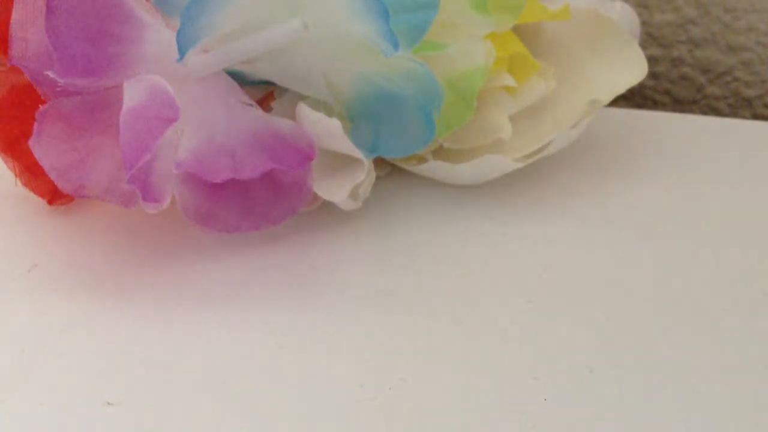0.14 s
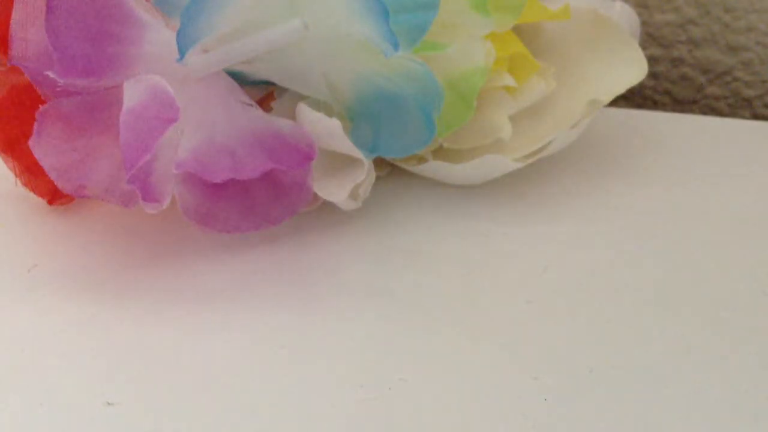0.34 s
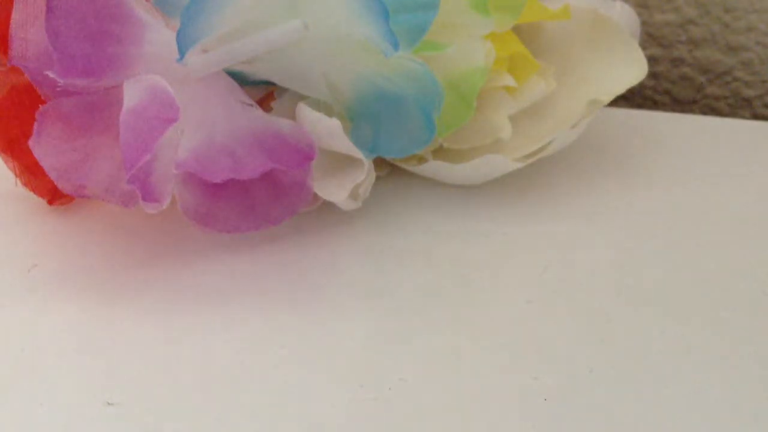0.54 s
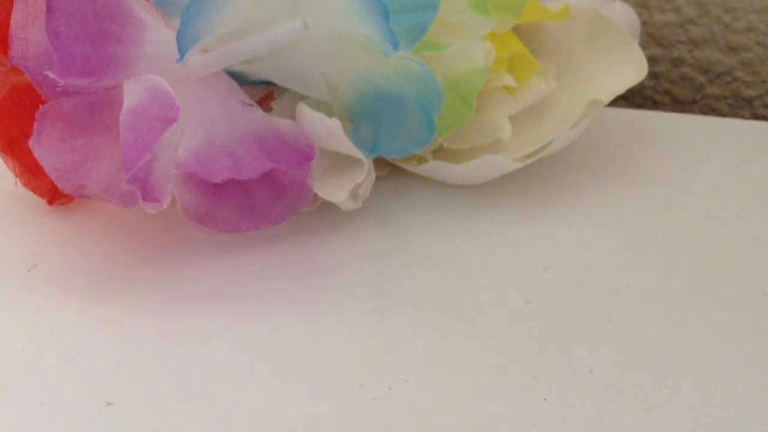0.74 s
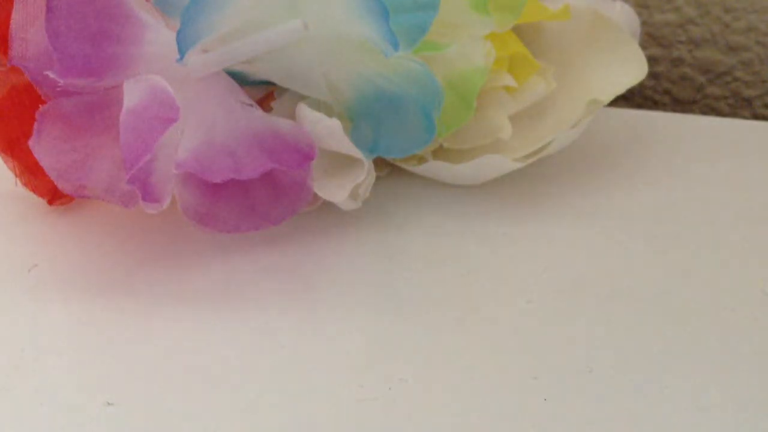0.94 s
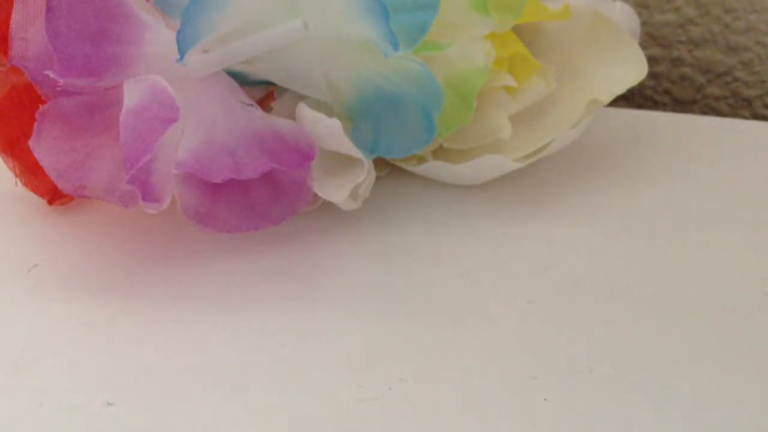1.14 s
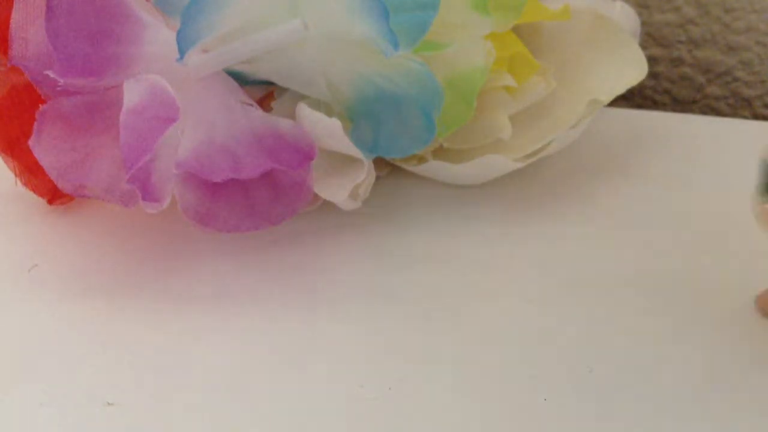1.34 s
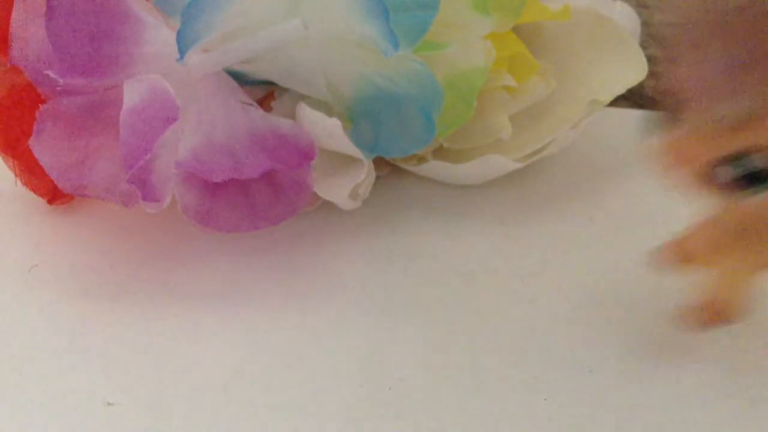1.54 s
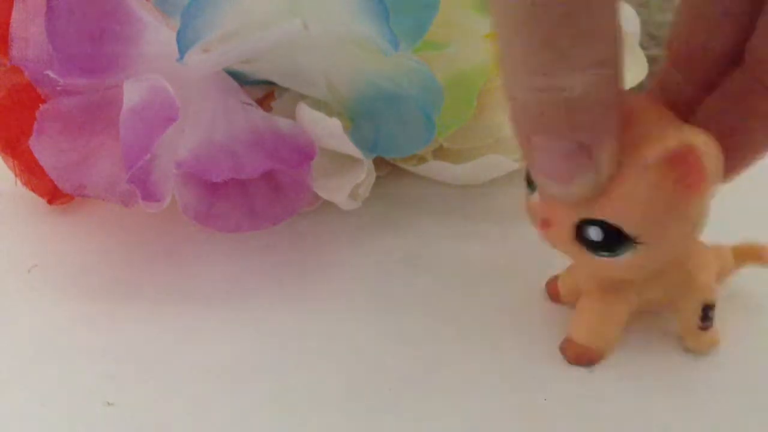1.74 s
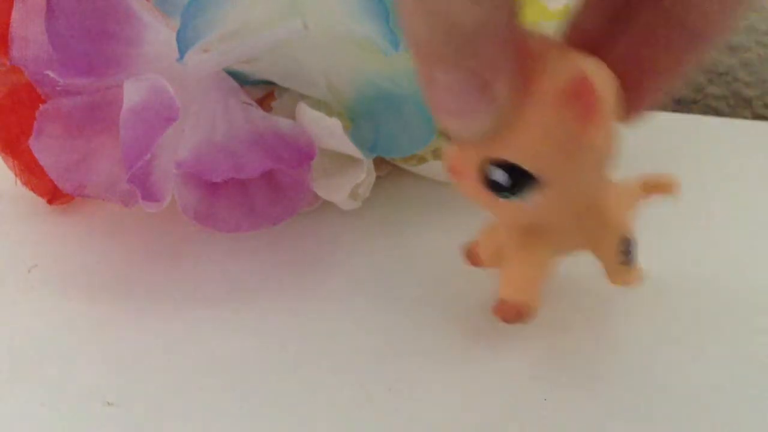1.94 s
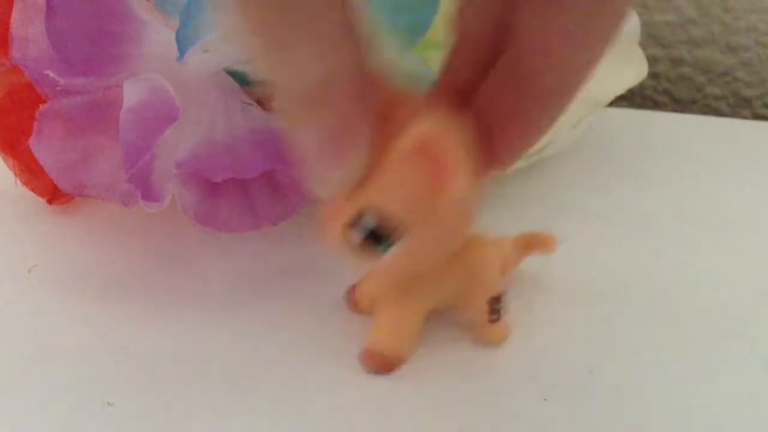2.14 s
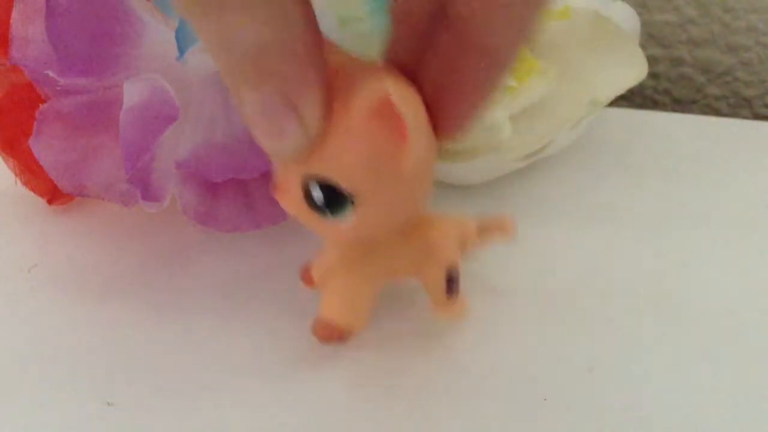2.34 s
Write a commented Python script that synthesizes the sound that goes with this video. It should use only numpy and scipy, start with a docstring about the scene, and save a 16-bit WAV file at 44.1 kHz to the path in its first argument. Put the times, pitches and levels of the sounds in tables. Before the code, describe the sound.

Light hollow clacks of a plastic toy figure hopping across a table, over faint hum.

```python
"""Faint mains hum and hiss in a quiet room, a light tick, then a small plastic toy figure hops along
a hard tabletop, close to the microphone. At each hop its feet clack down a few milliseconds apart:
the hollow toy knocks, the table rings and the room answers. Between the hops the plastic ticks
in the fingers, and there is one soft, dry pop."""
import sys
import numpy as np
from scipy import signal
from scipy.fft import rfft, irfft
from scipy.io import wavfile

SR = 44100
rng = np.random.default_rng(int(sys.argv[2]) if len(sys.argv) > 2 else 0)


def put_to_file(sound):
    """Save the sound as 16-bit audio at rate SR, in the file named by the first command-line argument."""
    columns = np.atleast_2d(sound).T  # one column per channel
    safe = np.clip(columns, -1, 1)
    whole_steps = np.round(safe * 32767)
    wavfile.write(sys.argv[1], SR, whole_steps.astype(np.int16))


N = 110250
RING_N = SR // 2
AGE_S = np.arange(RING_N) / SR   # time since a strike
LOW_CUT_HZ = 223   # thins the knocks and clacks


def from_db(db):
    """Decibels to gain."""
    return 10 ** (np.asarray(db) / 20)


def at_hz(table, hz, column=1):
    """Reads one column of a table along log frequency."""
    rows = np.array(table)
    return np.interp(np.log(hz + 1), np.log(rows[:, 0]), rows[:, column])


def butter(x, hz, kind, order=2):
    """Butterworth filter."""
    sos = signal.butter(order, np.clip(hz, 10, SR / 2 - 500), kind, fs=SR, output="sos")
    return signal.sosfilt(sos, x)


def add(track, start_s, sound):
    """Mixes a sound into a track at a time."""
    start = int(start_s * SR)
    track[start:start + len(sound)] += sound[:N - start]


def ring(hz, t60_s):
    """One struck mode: a sine dying away from full height."""
    return np.sin(2 * np.pi * hz * AGE_S) * from_db(-60 * AGE_S / t60_s)


def burst(t60_s):
    """Dying noise of unit energy."""
    noise = rng.standard_normal(RING_N) * from_db(-60 * AGE_S / t60_s) + 1e-18
    return noise / np.linalg.norm(noise)


def dense_ring(table):
    """Countless overlapping resonances: each third octave has its own level and decay."""
    out, edges_hz = 0, 125 * 2 ** (np.arange(22) / 3)
    for low, high in zip(edges_hz, edges_hz[1:]):
        centre_hz = np.sqrt(low * high)
        band = butter(burst(t60_s=at_hz(table, centre_hz, column=2)), [low, high], "band")
        gain = np.sqrt(2 * (high - low) / SR) * from_db(at_hz(table, centre_hz))
        out = out + gain * band / np.linalg.norm(band)
    return out


def snap(hz, t60_s, width):
    """A short click of noise around one pitch; width is a share of that pitch."""
    return butter(burst(t60_s), [hz / (1 + width), hz * (1 + width)], "band", order=1)


# The tones of the hum: pitch_hz, rms_db
HUM_TONES = [(120, -73.5), (180, -83), (241, -81), (296, -76.5), (360, -77.5)]
# EQ curve that turns white noise into hiss: frequency_hz, gain_db
HISS_EQ = [(40, -91), (80, -66), (125, -64), (200, -51.5), (330, -55), (550, -58.5), (1000, -61),
           (2500, -65.5), (7000, -67), (15000, -69.5)]

def background():
    """The bed: steady mains hum over an even hiss."""
    time_s = np.arange(N) / SR
    bins_hz = np.arange(N // 2 + 1) * SR / N
    hiss = irfft(rfft(rng.standard_normal(N)) * from_db(at_hz(HISS_EQ, bins_hz)), N)
    hum = sum(np.sqrt(2) * from_db(rms_db) * np.sin(2 * np.pi * (hz * time_s + rng.random()))
              for hz, rms_db in HUM_TONES)
    return hiss + hum


# Dense, short resonances of toy and table, in ticks and clacks alike: frequency_hz, gain_db, t60_s
BODY_RESONANCES = [(157, -19, .06), (298, 9.5, 0.02), (480, 9, 0.038), (830, 5, 0.09), (1570, 1.5, .05),
                   (2780, -0.5, 0.047), (3900, -6.5, 0.011), (5970, -12.5, 0.059), (14300, -39, 0.036)]
# The toy ticking in the fingers: start_s, level_db, pitch_hz
FINGER_TICKS = [(0.159, -24, 2550), (0.343, -28, 5140), (.497, -29.5, 800), (0.821, -24, 3100),
                (.8262, -37, 9000), (.831, -33.5, 10900), (0.8346, -20, 2960), (0.8378, -30.5, 5000),
                (1.959, -26, 830)]

def ticks():
    """Handled plastic gives tiny clicks, each ringing the toy a little."""
    out = np.zeros(N)
    for start_s, level_db, pitch_hz in FINGER_TICKS:
        click = snap(pitch_hz, t60_s=0.0093, width=0.26)
        body = from_db(-9.5) * dense_ring(BODY_RESONANCES)
        add(out, start_s, from_db(level_db) * (click + body))
    return out


# Colour and decay of the room's tail: frequency_hz, gain_db, t60_s
ROOM_TAIL = [(147, -6, 0.19), (295, -7.5, 0.18), (680, -9.5, 0.36), (1570, -12, 0.33), (2850, -11.5, 0.24),
             (5060, -14, 0.18), (14100, -9, 0.36)]

def room(send, predelay_s=0.0079, build_s=0.0014):
    """The room answers with a diffuse tail that builds just after the direct sound."""
    build = 1 - np.exp(-np.maximum(AGE_S - predelay_s, 0) / build_s)
    return signal.fftconvolve(send, dense_ring(ROOM_TAIL) * build)[:N]


# The tabletop's three low bending modes: pitch_hz, t60_s
TABLE_BENDS = [(186, 0.34), (277, 0.14), (412, 0.23)]
# Each landing's two toy notes and three table bends; grip and spot set the mix:
# start_s, lower_hz, lower_db, upper_hz, upper_db, bend1_db, bend2_db, bend3_db
LANDING_KNOCKS = [ (0.205, 704, -16, 868, -28.5, -45.5, -22.5, -32),
                  (.3392, 694, -37.5, 800, -49, -84, -44, -45.5),
                  (.6610, 695, -17.5, 895, -27.5, -45, -31.5, -32.5),
                  (.7850, 667, -43, 850, -55.5, -67, -47, -54), (1.31, 643, -30, 825, -31, -55, -43, -40),
                  (1.6710, 650, -24, 775, -25.5, -44.5, -34, -42),
                  (2.1290, 623, -24.5, 797, -29, -48, -49, -39.5),
                  (2.2085, 595, -43.5, 770, -55, -69, -68, -66.5)]

def knocks(attack_s=0.0037, toy_t60_s=0.08):
    """As the weight comes down, the toy's two hollow notes and the table's bends swell and die."""
    out = np.zeros(N)
    swell = 1 - np.exp(-AGE_S / attack_s)
    for start_s, lower_hz, lower_db, upper_hz, upper_db, *bends_db in LANDING_KNOCKS:
        lower = from_db(lower_db) * ring(lower_hz, toy_t60_s)
        upper = from_db(upper_db) * ring(upper_hz, toy_t60_s)
        table = sum(from_db(db) * ring(hz, t60_s) for db, (hz, t60_s) in zip(bends_db, TABLE_BENDS))
        add(out, start_s, swell * (lower - upper + table))
    return butter(out, LOW_CUT_HZ, "high", order=3)


# The tabletop's higher modes: pitch_hz, gain_db, t60_s
TABLE_OVERTONES = [(360, -46, 0.048), (471.6, -44.5, 0.061), (567, -47, 0.059), (735, -51, 0.082),
                   (1199, -44, 0.068), (1343, -29, 0.032), (1590, -36.5, 0.037), (1732, -29, 0.043),
                   (2115, -41.5, 0.04), (2726, -29.5, 0.019), (2920, -43, 0.038), (3393, -32, 0.013),
                   (3937, -40.5, 0.019)]
# A foot meets the table: start_s, level_db, brightness_hz, crack_db
FOOT_CONTACTS = [ (0.2051, -0.5, 1550, -23.5), (0.2114, -0.5, 2600, -24), (0.3387, -12.5, 1850, -34),
                 (.6590, -5, 2560, -18), (.6667, -4.5, 4580, -25), (.6682, 3, 3730, -24),
                 (.7845, -24.5, 2530, -22), (1.3094, -9.5, 1630, -31), (1.3241, -5.5, 1850, -34),
                 (1.3261, -8, 1630, -26), (1.6696, -5, 2270, -14.5), (1.6771, -3.5, 2160, -18.5),
                 (1.782, -19, 800, -30), (2.1264, -6, 1600, -23.5), (2.1324, -1.5, 4480, -25.5),
                 (2.2033, -20, 2350, -16), (2.2115, -21, 1190, -30)]

def clacks(mode_spread_db=3):
    """Each foot strike rings toy and table, with a bright crack on top and a faint thud below."""
    out = np.zeros(N)
    for start_s, level_db, brightness_hz, crack_db in FOOT_CONTACTS:
        impact = from_db(-13.5) * ring(0.79 * brightness_hz, t60_s=0.0018)   # the foot's first stiff swing
        body = dense_ring(BODY_RESONANCES) + impact
        for k, (hz, gain_db, t60_s) in enumerate(TABLE_OVERTONES):
            gain = from_db(gain_db + mode_spread_db * rng.standard_normal())
            body += (-1) ** k * gain * ring(hz, t60_s)
        body = butter(body, brightness_hz, "low")
        body = butter(body, LOW_CUT_HZ, "high", order=3)
        crack = from_db(crack_db) * snap(hz=7040, t60_s=0.017, width=0.13)
        # The hand pushes through the table; level_db counts twice, so this grows as strength squared.
        thud = from_db(-60.5 + level_db) * ring(hz=44.3, t60_s=0.038)
        add(out, start_s, from_db(level_db) * (body + crack + thud))
    return out


def pop(start_s=1.1918, pitch_hz=528, length_s=0.004):
    """One soft, dry pop of a few cycles with a sharp edge, right at the microphone."""
    out = np.zeros(N)
    arch = np.sqrt(np.maximum(1 - (2 * AGE_S / length_s - 1) ** 2, 0))
    tone = from_db(-37) * arch * np.sin(2 * np.pi * pitch_hz * AGE_S)
    edge = from_db(-27) * snap(hz=4200, t60_s=0.018, width=0.42)
    add(out, start_s, tone + edge)
    return butter(out, 370, "high")


def scene():
    """The mono mix: the toy in its room and the dry pop, over the bed."""
    bright = clacks() + ticks()
    low = knocks()
    tail = room(bright + from_db(-7.5) * low)   # the low notes reach the room more weakly
    return (bright + low + tail + pop() + background())[None]


def record(dry, cutoff_hz=15250):
    """A steep low-pass takes off the very top."""
    return signal.sosfilt(signal.ellip(10, .1, 70, cutoff_hz, fs=SR, output="sos"), dry)


dry = scene()
out = record(dry)
put_to_file(out)
```